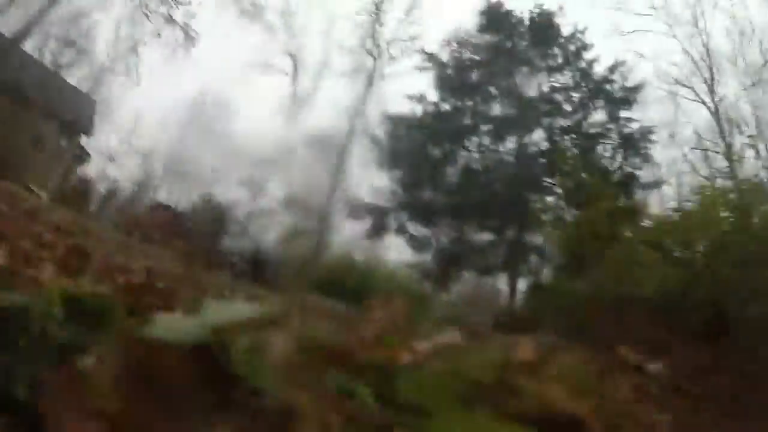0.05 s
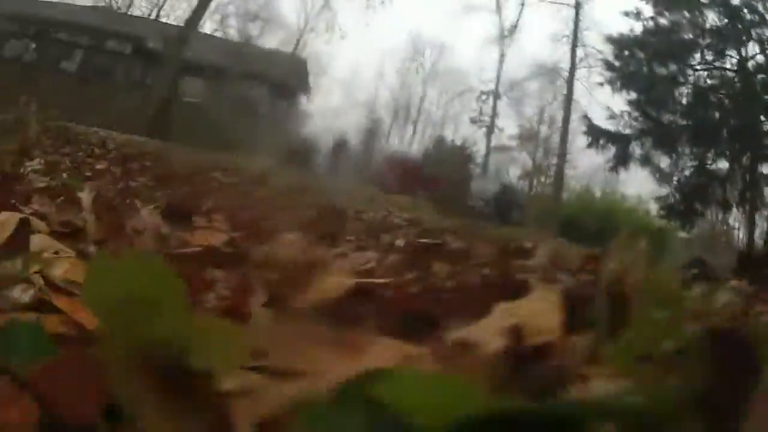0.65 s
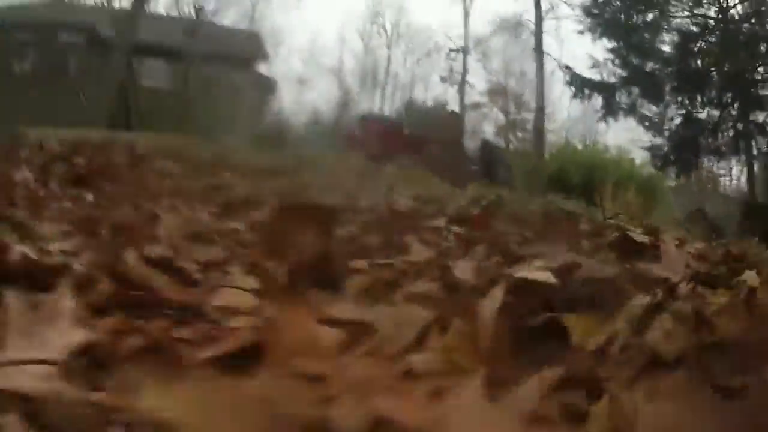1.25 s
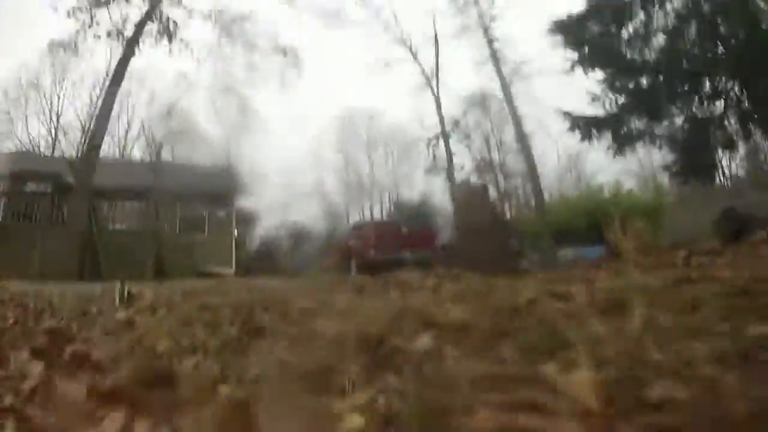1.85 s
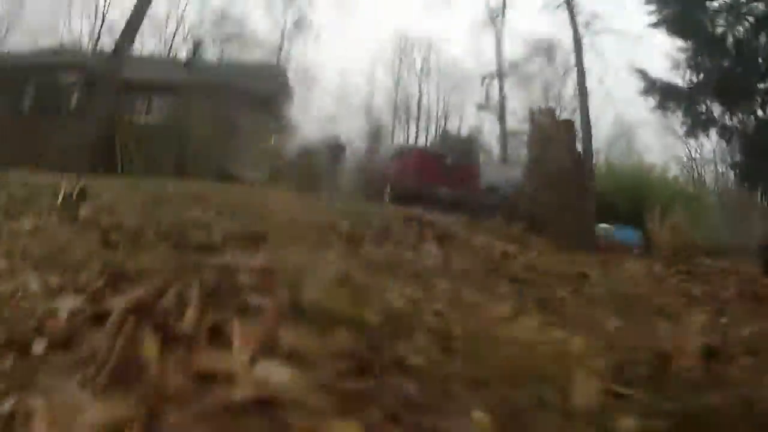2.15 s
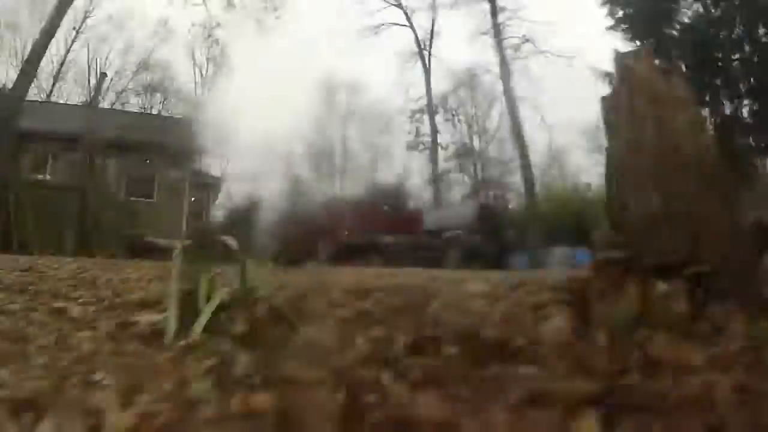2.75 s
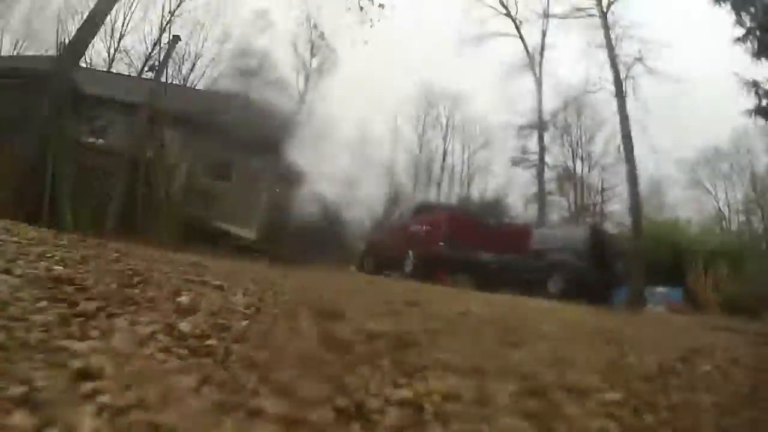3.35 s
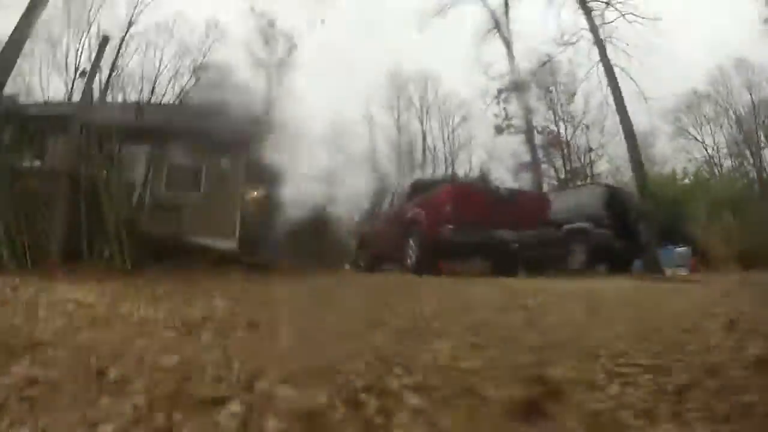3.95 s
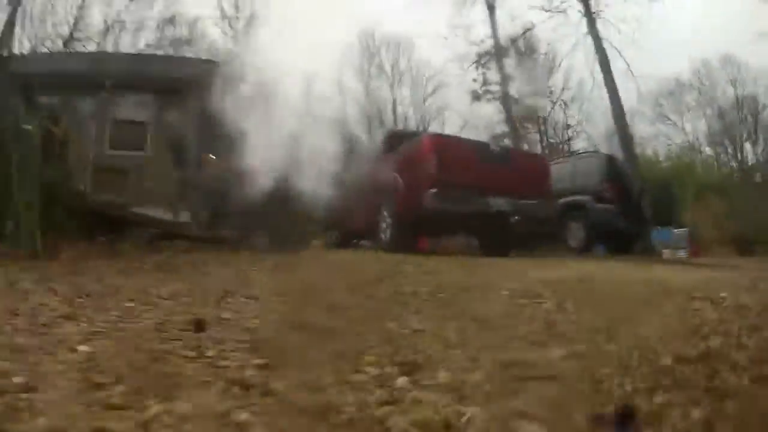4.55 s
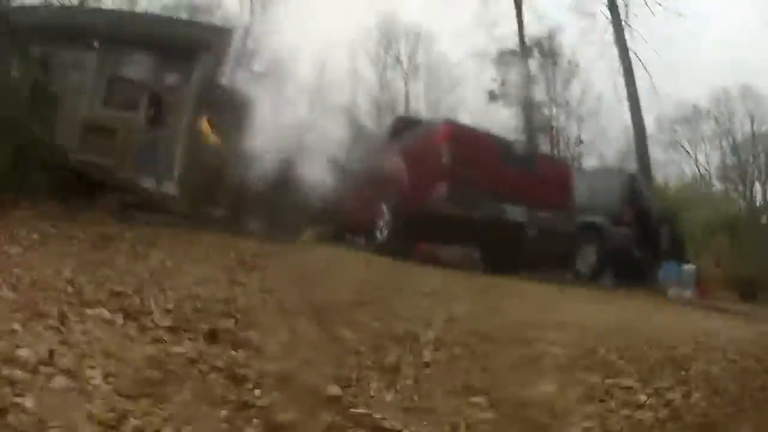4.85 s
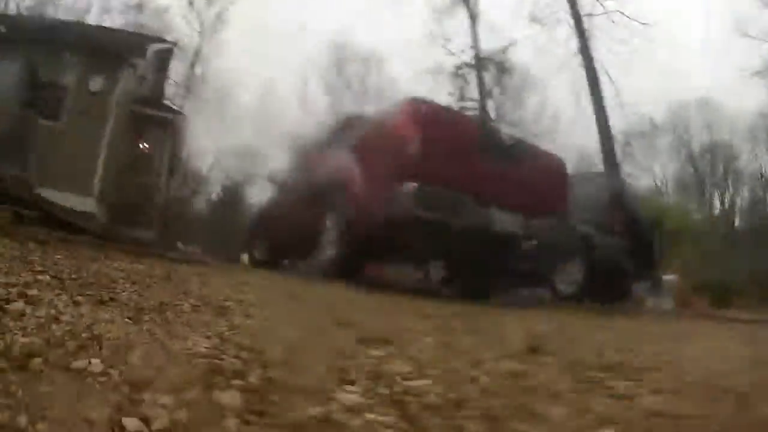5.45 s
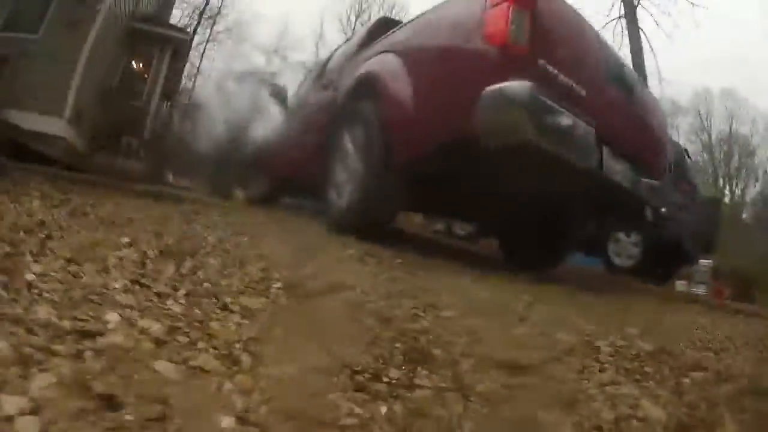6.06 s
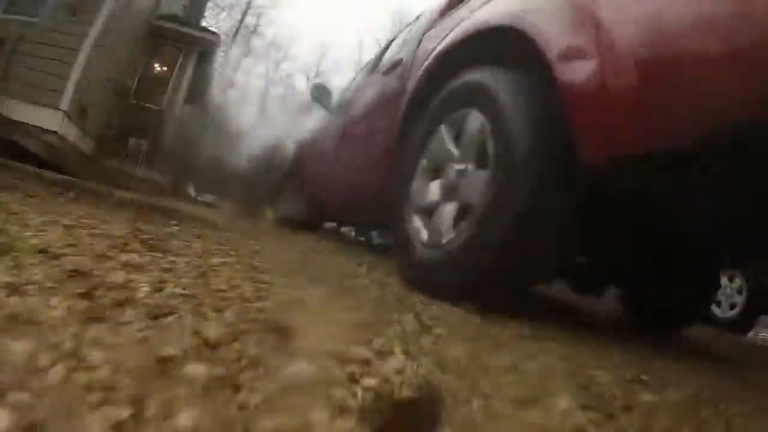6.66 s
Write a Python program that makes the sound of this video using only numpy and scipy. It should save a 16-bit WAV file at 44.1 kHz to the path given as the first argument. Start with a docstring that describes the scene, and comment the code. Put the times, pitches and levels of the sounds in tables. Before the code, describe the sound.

A loose plastic camera mount knocks and clicks irregularly on the harness of an animal running outdoors. Straps rub, dry leaves rustle and the swaying body adds a low rumble. Early on, the housing thumps and crunches into deeper leaves and the knocks thin out; then they crowd back, with two especially hard, slightly distorted blows. The microphone sits inside the housing, so everything sounds very close, boxy and a little gritty.

```python
"""Dry leaves and dirt, from a microphone inside a plastic camera housing on a running animal's harness.
From the start the body sways, straps rub and leaves rustle; the loose mount knocks and clicks, very close.
Near 0.75 s the housing crunches into deeper leaves and takes its first thump; then the knocks thin out.
From 2 s they crowd in again, and the hardest, near 3.5 s and 6.3 s, overload the microphone.
Throughout, the camera samples at only 12 kHz and holds each sample, which adds a gritty treble."""
import sys
import numpy as np
from scipy import signal
from scipy.fft import rfft, irfft, next_fast_len
from scipy.io import wavfile
from scipy.ndimage import map_coordinates

SR = 44100
rng = np.random.default_rng(int(sys.argv[2]) if len(sys.argv) > 2 else 0)


def wrap_up_sound(samples):
    """Save the sound to the file named by the first command line argument, as 16-bit audio."""
    columns = np.atleast_2d(samples).T
    # keep every value between -1 and 1, then stretch to whole-number steps
    tamed = np.clip(columns, -1, 1)
    steps = np.round(tamed * 32767).astype(np.int16)
    wavfile.write(sys.argv[1], SR, steps)


N = 295029
HIT = 4096  # samples in one short sound

# blows of the loose mount: t/s, knock level/dB, knock f/Hz, clack level/dB, click level/dB, ping level/dB
MOUNT_BLOWS = [(0.0854, -12.5, 597, -28, -29.5, -29), (0.1276, -10.5, 580, -24.5, -26.5, -29),
               (0.2725, -31.5, 555, -25.5, -21.5, -27.5), (0.318, -22.5, 463, -31.5, -32, -43),
               (0.3333, -8.5, 670, -21, -15, -23), (0.5164, -21.5, 716, -45, -37, -46),
               (0.528, -13.5, 633, -42, -28.5, -32.5), (.566, -21.5, 630, -28, -34, -44),
               (0.5922, -29, 755, -52, -42, -59), (0.6736, -26, 730, -25.5, -31, -49),
               (.6808, -13.5, 690, -24.5, -28, -33), (0.7077, -20, 575, -39, -40, -47),
               (0.7263, -22, 680, -37, -35, -49), (.7364, -20, 720, -50, -49, -54),
               (.7528, -21, 664, -46, -47, -49), (.7783, -31, 716, -33, -35, -46),
               (.8148, -24, 680, -25, -20.5, -23), (.8344, -16, 660, -30, -19.5, -46),
               (.8852, -25.5, 760, -35, -28.5, -38), (1.1554, -27, 535, -33, -62, -65),
               (1.173, -26.5, 456, -40, -48, -45), (1.2526, -26.5, 724, -62, -51, -50),
               (1.4253, -37, 704, -45, -13.5, -25.5), (1.558, -26.5, 485, -50, -51, -61),
               (1.7067, -34.5, 500, -33.5, -30.5, -37), (1.844, -36, 635, -47, -26, -40),
               (1.975, -23.5, 505, -47, -44, -45), (1.9926, -51, 570, -44, -33, -35),
               (2.0239, -8.5, 560, -48, -30, -32), (2.0306, -16.5, 640, -29, -33, -38),
               (2.066, -22, 630, -29, -46, -49), (2.0719, -20, 580, -22, -26, -22.5),
               (2.086, -15.5, 610, -17.5, -21, -18), (2.1969, -13, 690, -12.5, -24, -19),
               (2.2479, -22.5, 560, -33, -43, -49), (2.2627, -25, 736, -25, -43, -21.5),
               (2.2922, -13, 590, -24, -36, -27), (2.3, -25, 610, -23, -27, -30.5),
               (2.354, -29.5, 637, -33, -37, -41), (2.3619, -24, 617, -29.5, -34.5, -50),
               (2.4021, -35, 567, -43, -41, -43), (2.4488, -33, 618, -36, -30, -42),
               (2.4829, -31, 590, -42, -47, -57), (2.5015, -21.5, 653, -27, -26.5, -32),
               (2.56, -25, 630, -32, -28, -42), (2.5702, -8.5, 624, -22, -15.5, -16.5),
               (2.6072, -30, 704, -34.5, -56, -28.5), (2.674, -12.5, 587, -21.5, -22.5, -20),
               (2.7275, -16.5, 750, -20.5, -25, -16.5), (2.7771, -24.5, 660, -38, -37, -43),
               (2.8345, -15.5, 600, -16.5, -22, -28), (2.938, -21.5, 510, -30, -39, -43),
               (2.9578, -21.5, 477, -45, -39, -60), (2.9762, -15, 620, -31, -32, -33.5),
               (2.9833, -20.5, 637, -16, -26.5, -29.5), (3.1545, -21, 684, -26, -25.5, -28.5),
               (3.1674, -19, 690, -32, -45, -52), (3.1932, -9, 631, -23.5, -23, -21.5),
               (3.2909, -11, 646, -21.5, -43, -36), (3.4113, -22, 584, -33, -38, -54),
               (3.436, -22, 470, -41, -40, -52), (3.4524, -27, 590, -21, -26, -23),
               (3.4783, -4, 551, -29, -25, -26.5), (3.4845, -13.5, 540, -49, -34, -42),
               (3.62, -32.5, 520, -47.5, -67, -67), (3.684, -9.5, 685, -19.5, -23, -37),
               (3.7118, -9, 560, -29, -34, -34.5), (3.7786, -29, 606, -50, -48, -49),
               (3.8336, -24.5, 596, -44, -64, -62), (3.879, -27, 610, -48, -44.5, -54),
               (3.9532, -22.5, 676, -28, -45, -52), (3.9666, -17.5, 660, -38, -46, -66),
               (4.0838, -7.5, 590, -17, -20, -26.5), (4.152, -17.5, 509, -62, -57, -72),
               (4.2684, -20.5, 505, -56, -47, -53), (4.299, -15, 708, -15, -28, -24.5),
               (4.381, -17.5, 517, -57, -46, -66), (4.4833, -23.5, 520, -63, -48, -60),
               (4.5222, -24.5, 634, -48, -44, -51), (4.5413, -13, 537, -33.5, -27.5, -52),
               (4.5583, -20, 630, -34, -47, -59), (4.5665, -11.5, 640, -22, -30, -34),
               (4.6312, -31.5, 417, -52, -40, -35), (4.663, -23, 555, -35, -42, -38),
               (4.6883, -23.5, 540, -48, -59, -65), (4.791, -19, 590, -41, -46, -44),
               (4.807, -19.5, 476, -39, -36, -38.5), (4.8222, -31, 630, -56, -53, -32.5),
               (4.8653, -15, 595, -30, -39, -58), (4.8845, -23.5, 605, -52, -61, -64),
               (4.9557, -12.5, 566, -49, -36, -38), (5.0272, -23, 530, -41, -48, -58),
               (5.0424, -15, 640, -32.5, -43, -46), (5.0727, -16.5, 560, -22.5, -38, -36),
               (5.102, -37, 573, -40, -33, -35.5), (5.1117, -28, 433, -35, -30.5, -28),
               (5.2294, -24, 510, -65, -44, -62), (5.2984, -18, 510, -38, -37, -43),
               (5.3263, -11, 660, -22.5, -27.5, -33), (5.3583, -28.5, 630, -38, -46, -37),
               (5.4064, -28, 625, -40.5, -42, -48), (5.4356, -21, 507, -58, -49, -47),
               (5.4807, -16, 606, -19, -22, -16), (5.5072, -25, 624, -46, -53, -57),
               (5.5206, -24, 630, -36, -45, -51), (5.5484, -24, 574, -26.5, -47, -41),
               (5.5658, -38, 665, -40, -30, -32), (5.578, -24, 654, -39, -37, -35.5),
               (5.6132, -18, 647, -39.5, -46, -44), (5.6546, -30, 526, -62, -50, -38.5),
               (5.7414, -25.5, 520, -43, -49, -46), (5.752, -19.5, 590, -36, -43, -39),
               (5.7625, -19, 505, -37, -32.5, -53), (5.7848, -10, 670, -23.5, -26, -32),
               (5.8488, -15, 580, -38, -38, -47), (5.8597, -21.5, 660, -17, -26, -18),
               (5.9231, -25, 585, -27, -38, -30), (5.974, -22, 570, -35.5, -47, -64),
               (5.9808, -21.5, 570, -38, -45, -67), (6.0357, -9, 603, -45, -26.5, -30),
               (6.1445, -19, 555, -38, -47, -46), (6.165, -22, 490, -35.5, -49, -44),
               (6.1878, -20, 456, -30, -33, -41), (6.294, -2, 528, -18.5, -14.5, -19),
               (6.3422, -28.5, 630, -37, -44, -48), (6.4476, -25.5, 596, -47, -58, -49),
               (6.5137, -8.5, 563, -30, -27, -33), (6.6318, -24, 572, -46, -55, -41),
               (6.67, -26.5, 497, -43.5, -57, -51)]
# resonances of the plastic, as hollow clack, hard click and ping: f/Hz, width/Hz, level/dB
CLACK_MODES = [(1230, 670, -10), (1871, 196, 8), (2240, 420, -5)]
CLICK_MODES = [(2657, 1230, -3.5), (2947, 614, 3), (3288, 400, -6.5)]
PING_MODES = [(3870, 330, 3.5), (4290, 430, 0), (4810, 500, -2.5)]
# spectrum of the straps rubbing, also of the housing's shiver: f/Hz, level/dB
RUB_SPECTRUM = [(100, -45), (250, -1), (400, 3.5), (520, 1.5), (700, 2.5), (830, -6.5), (1050, -56),
                (1500, -11), (3000, -71)]


def amp(db):
    return 10 ** (np.asarray(db) / 20)


def unit(x):
    return x / np.sqrt(np.mean(x ** 2) + 1e-20)


def unit_hit(x):
    """A short sound scaled to the energy of rms 1 held for 10 ms."""
    return x / np.sqrt(np.sum(x ** 2) / (SR / 100) + 1e-20)


def add(track, s, sound):
    """Mix a sound into a track at s seconds."""
    start = max(round(s * SR), 0)
    part = track[start:start + len(sound)]
    part += sound[:len(part)]


def curve(rows):
    """One value per sample from (t/s, value) rows."""
    return np.interp(np.arange(N) / SR, *np.transpose(rows))


def wobble(rate):
    """A smooth random curve, rate knots a second."""
    return map_coordinates(rng.standard_normal(int(N * rate / SR) + 4), [np.arange(N) * rate / SR])


def grains(rate, spread_db):
    """Sparse impulses of random sign and size, about rate a second."""
    return (rng.random(N) < rate / SR) * rng.standard_normal(N) * amp(spread_db * rng.standard_normal(N))


def filtered(x, response):
    """x through a complex frequency response."""
    size = x.shape[-1]
    padded = next_fast_len(size + HIT)
    return irfft(rfft(x, padded) * response(np.fft.rfftfreq(padded, 1 / SR)), padded)[..., :size]


def coloured(x, points):
    """x shaped by (f/Hz, level/dB) points on a log axis."""
    f, db = np.transpose(points)
    return filtered(x, lambda hz: amp(np.interp(np.log(hz + 1), np.log(f), db, right=-120)))


def resonate(x, modes):
    """x rings (f/Hz, width/Hz, level/dB) resonances of alternating sign."""
    return filtered(x, lambda f: sum(
        (-1) ** k * amp(db) * 1j * f * width / (hz * hz - f * f + 1j * f * width)
        for k, (hz, width, db) in enumerate(modes)))


def footing(edge_s=0.011):
    """Gain that is 1 on the ground and dips between footfalls."""
    # the harness hangs free: start t/s, end t/s, level/dB
    lulls = [(-.02, 0.077, -0.5), (0.34, 0.496, -6), (2.112, 2.171, -11), (3.3, 3.33, -22),
             (3.49, 3.582, -13), (3.725, 3.768, -14), (4.097, 4.165, -13), (4.32, 4.35, -2),
             (4.573, 4.625, -6.5), (5.117, 5.207, -2.5), (6.054, 6.104, -8), (6.293, 6.35, -5)]
    t = np.arange(N) / SR
    return amp(sum(db * np.clip(np.minimum(t - start, end - t) / edge_s + 0.5, 0, 1)
                   for start, end, db in lulls))


def body_sway(gain_db=2):
    """The body right under the microphone sways the camera: an uneven rumble."""
    # strength of the sway: t/s, level/dB
    sway_levels = [(0.0, -50), (0.54, -55), (0.89, -39.5), (1.06, -48), (1.75, -49), (1.86, -48),
                   (2.27, -54.5), (3.0, -43.5), (3.63, -65.5), (4.08, -47), (4.71, -49), (5.4, -53),
                   (5.66, -45), (6.0, -57), (6.41, -53), (6.69, -45)]
    # spectrum of the rumble: f/Hz, level/dB
    sway_spectrum = [(10, -42), (25, 2), (50, -0.5), (100, -2.5), (180, -0.5), (350, -12), (800, -49)]
    level = amp(curve(sway_levels) + gain_db + 3.5 * wobble(13)) * footing() ** 0.4
    return level * unit(coloured(rng.standard_normal(N), sway_spectrum))


def strap_strain(leaf_level, rest_db=-48.5, pull_db=-27.5, drag_db=-6, tighten_s=0.0035, slacken_s=0.018):
    """Level of the rubbing: the camera's weight at rest, the pull at each blow, the drag of the leaves."""
    pull_power, t = np.zeros(N), np.arange(-HIT // 2, HIT) / SR
    pull = np.exp(np.minimum(t / tighten_s, -t / slacken_s))
    for s, knock_db, *_ in MOUNT_BLOWS:
        add(pull_power, s + t[0], (amp(pull_db + 0.31 * knock_db) * pull) ** 2)
    load_power = (pull_power + amp(rest_db) ** 2) * footing() ** 2
    return np.sqrt(load_power + (amp(drag_db) * leaf_level) ** 2)


def straps(leaf_level, rub_db=0.5, hum_db=-7, tap_db=-4, tick_db=-24):
    """The straps rub against the mount, tap it lightly and keep it humming faintly."""
    slips = unit(grains(rate=230, spread_db=1.5)) + 0.76 * rng.standard_normal(N)
    grip = amp(3 * wobble(45))
    rub = amp(rub_db) * grip * unit(coloured(slips, RUB_SPECTRUM))
    hum = amp(hum_db) * unit(resonate(slips, [(712, 21, 0)]))
    touches = grains(rate=45, spread_db=5)
    taps = amp(tap_db) * unit(resonate(resonate(touches, [(566, 250, 0)]), [(592, 190, 0)]))
    ticks = amp(tick_db) * unit(resonate(touches, CLACK_MODES + CLICK_MODES + PING_MODES))
    return strap_strain(leaf_level) * (rub + hum + taps + ticks)


def leaf_levels(bed_gain_db=0.5):
    """Levels of swish and crunch: each sweep through the leaves swells and fades over a steady rustle."""
    # steady rustle, loud in the deep drift and faint on bare dirt: t/s, level/dB
    rustle_bed = [(0.0, -60.5), (0.58, -46.5), (0.71, -40), (1.97, -46), (2.25, -58), (2.44, -49.5),
                  (3.32, -44.5), (3.45, -52), (4.34, -55.5), (4.69, -44.5), (4.99, -53.5), (5.65, -46.5),
                  (5.98, -49.5), (6.69, -50)]
    # feet and housing sweep through leaves: start t/s, end t/s, level/dB, crunchy share (0-1)
    sweeps = [(0.086, .25, -44.5, 0.2), (0.523, 0.604, -39.5, 0), (0.729, 0.796, -24, 0.8),
              (0.801, 0.875, -25, 0.9), (0.986, 1.14, -35.5, 0.18), (1.217, 1.3, -38, 0.34),
              (1.375, 1.445, -25.5, 0.7), (1.546, 1.657, -41.5, 0.03), (1.692, 1.779, -33, 0.3),
              (1.83, 1.869, -32.5, .9), (1.97, 2.04, -39, 0.4), (2.07, 2.1, -30, 0), (2.257, 2.288, -27, 1),
              (3.087, 3.13, -42.5, 0.4), (3.322, 3.423, -43, .7), (3.78, 3.88, -53, .2),
              (3.996, 4.083, -46, 0.07), (4.186, 4.33, -48.5, 0.16), (4.66, 4.766, -63, 1),
              (5.192, 5.221, -39.5, 0.87), (5.41, 5.46, -48, .1), (5.66, 5.79, -42, 0.5),
              (6.11, 6.2, -44, 0.14), (6.597, 6.651, -37, 0.4)]
    t = np.arange(N) / SR
    swish_power = (amp(curve(rustle_bed) + bed_gain_db) * footing()) ** 2
    crunch_power = np.zeros(N)
    for start, end, db, crunchy in sweeps:
        arch = np.clip(4 * (t - start) * (end - t) / (end - start) ** 2, 0, 1)
        power = amp(db) ** 2 * arch
        swish_power += (1 - crunchy) * power
        crunch_power += crunchy * power
    return np.sqrt(swish_power), np.sqrt(crunch_power)


def leaves(swish_level, crunch_level):
    """Dry leaves swish close by, with tiny cracks inside; deep drifts scrape along the housing."""
    # resonances of leaves heard through the housing: f/Hz, width/Hz, level/dB
    leaf_modes = [(630, 270, 4.5), (1780, 210, -13), (2220, 970, -2.5), (2926, 380, 4.5), (3840, 610, 0),
                  (5200, 204, -45)]
    cracks = 0.7 * unit(grains(rate=1400, spread_db=3)) + rng.standard_normal(N)
    # each leaf that passes favours other resonances
    voices = sum(amp(5 * wobble(35)) * resonate(cracks, [mode]) * (-1) ** k
                 for k, mode in enumerate(leaf_modes))
    swish = amp(3.5 * wobble(90)) * unit(voices)
    crunch = unit(resonate(grains(rate=900, spread_db=3), leaf_modes))
    return swish_level * swish + crunch_level * crunch


def knocks(soft_swell_s=0.0012, hard_swell_s=0.00085, push_hz=110, arm_hz=310, shiver_t60=0.026):
    """The mount slides, the housing swings against its joint for a few cycles, then shivers on."""
    out, t = np.zeros(N), np.arange(HIT) / SR
    chance = rng.standard_normal((len(MOUNT_BLOWS), 4))
    noises = coloured(rng.standard_normal((len(MOUNT_BLOWS), HIT)), RUB_SPECTRUM)
    for (s, db, hz, *_), (stretch, phase, push_phase, flex), noise in zip(MOUNT_BLOWS, chance, noises):
        # light blows swell more slowly than hard ones
        swell_s = np.interp(db, [-28, -12], [soft_swell_s, hard_swell_s]) * np.exp(0.023 * stretch)
        age = t / swell_s
        swing = unit_hit(age ** 2.15 * np.exp(-age) * np.sin(2 * np.pi * hz * t + phase))
        push = unit_hit(age * np.exp(-age / 1.02) * np.sin(2 * np.pi * push_hz * t + push_phase))
        # dull, low blows also flex the arm of the mount
        bend = amp(2 * flex) * (600 / hz) ** 3
        arm = bend * unit_hit(age * np.exp(-age / 2.48) * np.sin(2 * np.pi * arm_hz * t))
        shiver = unit_hit(noise * amp(-60 * t / shiver_t60) * (1 - np.exp(-t / 0.01)))
        slide = unit_hit(noise * np.exp(-t[::-1] / 0.0023))[HIT // 2:]
        add(out, s - len(slide) / SR, amp(db - 28) * slide)
        add(out, s, amp(db) * (swing + amp(-21) * (push + arm + shiver)))
    return out


def clicks(burst_t60=0.018, chatter_db=-24, chatter_t60=0.025, scuff_db=-27, scuff_s=0.002):
    """Plastic scuffs, cracks against plastic and chatters; each blow mixes clack, click and ping anew."""
    out, t = np.zeros(N), np.arange(-HIT // 4, HIT // 2) / SR
    after = np.maximum(t, 0)
    burst = amp(-60 * after / burst_t60)
    chatter = amp(chatter_db - 60 * after / chatter_t60)
    scuff = amp(scuff_db) * np.exp(-np.abs(t) / scuff_s)
    noise = rng.standard_normal((len(MOUNT_BLOWS), len(t)))
    force = noise * np.abs(noise) * ((burst + chatter) * (t > 0) + scuff)
    # the face seats with one sharp impulse just after the edge touches
    force[:, np.searchsorted(t, 0.0006)] += 5
    registers = [resonate(force, modes) for modes in (CLACK_MODES, CLICK_MODES, PING_MODES)]
    for (s, _, _, *levels), *rings in zip(MOUNT_BLOWS, *registers):
        add(out, s + t[0], sum(amp(db) * unit_hit(ring) for db, ring in zip(levels, rings)))
    return out


def housing_ring():
    """The housing rings on around the microphone: a low mode after a knock, a hollow one after a clack."""
    # lightly damped modes of the housing: f/Hz, level/dB, t60/s
    ring_modes = [(710, -21.5, 0.11), (1826, -6, 0.039)]
    out, t = np.zeros(N), np.arange(2 * HIT) / SR
    chance = rng.standard_normal((len(MOUNT_BLOWS), len(ring_modes), 2))
    for (s, knock_db, _, clack_db, *_), draws in zip(MOUNT_BLOWS, chance):
        for drive_db, (hz, db, t60), (strength, detune) in zip((knock_db, clack_db), ring_modes, draws):
            ring = np.sin(2 * np.pi * hz * (1 + 0.0097 * detune) * t) * amp(-60 * t / t60)
            add(out, s, amp(drive_db + db + 2.6 * strength) * ring)
    return out


def rattle(earliest_s=0.0059, latest_s=0.026, click_db=-19):
    """After each blow the mount drops back with a light, dull knock."""
    touches = np.zeros(N)
    for (s, knock_db, *_), (flight, size) in zip(MOUNT_BLOWS, rng.random((len(MOUNT_BLOWS), 2))):
        delay_s = earliest_s + flight * (latest_s - earliest_s)
        add(touches, s + delay_s, np.array([size * amp(-27 + 0.33 * knock_db)]))
    impulse = signal.unit_impulse(HIT)
    knock = unit_hit(resonate(resonate(impulse, [(580, 230, 0)]), [(614, 230, 0)]))
    click = unit_hit(resonate(impulse, CLACK_MODES + CLICK_MODES + PING_MODES))
    return signal.fftconvolve(touches, knock + amp(click_db) * click)[:N]


def thumps_and_twang():
    """Low thumps of heavy landings, and one longer strap twang near 3.05 s."""
    # landing thumps and the strap twang: t/s, level/dB, f/Hz, swell/s
    low_hits = [(0.771, -18, 152, 0.00054), (0.923, -27.5, 70, 0.0023), (2.571, -17.5, 121, 0.0012),
                (3.038, -23, 69.6, 0.0028), (3.049, -30.5, 281, 0.021), (3.477, -2, 342, 0.0011),
                (3.480, -9, 102, 0.0023), (4.084, -18.5, 109, 0.0013), (4.153, -23, 303, 0.0033),
                (5.48, -24.5, 117.8, 0.00047), (6.292, -8.5, 119.4, 0.0026), (6.291, -25, 50.3, .005),
                (6.2959, -7.5, 381, 0.0011)]
    out, t = np.zeros(N), np.arange(HIT) / SR
    for s, db, hz, swell_s in low_hits:
        add(out, s, -amp(db) * unit_hit(t * np.exp(-t / swell_s) * np.sin(2 * np.pi * hz * t)))
    return out


def scene():
    """Everything reaches the one microphone at close range, through the housing."""
    swish_level, crunch_level = leaf_levels()
    impacts = knocks() + clicks() + housing_ring() + rattle() + thumps_and_twang()
    harness = body_sway() + straps(np.hypot(swish_level, crunch_level))
    return (impacts + harness + leaves(swish_level, crunch_level))[None]


def record(dry, edge_hz=5900, ceiling=0.71, top_hz=15700):
    """Hard blows overload the input; 12 kHz samples are held as steps, mirroring the sound around 12 kHz."""
    narrow = filtered(dry, lambda hz: 1 / np.sqrt(1 + (hz / edge_hz) ** 20))
    samples = signal.resample_poly(narrow, 12000, SR, axis=1)
    clipped = samples / (1 + np.abs(samples / ceiling) ** 12) ** (1 / 12)
    held = np.repeat(clipped, 4, axis=1)
    steps = signal.resample_poly(held, SR, 48000, axis=1)[:, :N]
    return filtered(steps, lambda hz: 1 / (1 + (hz / top_hz) ** 100))


dry = scene()
out = record(dry)
wrap_up_sound(out)
```